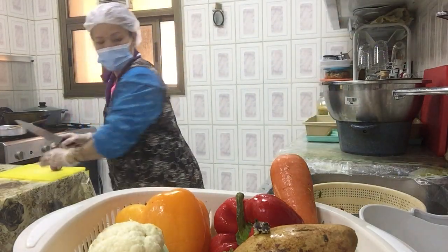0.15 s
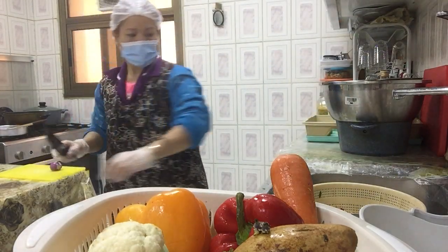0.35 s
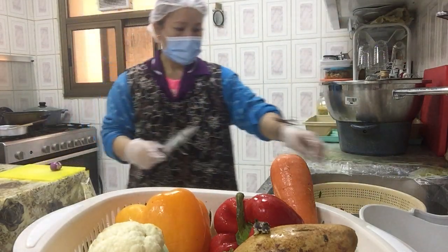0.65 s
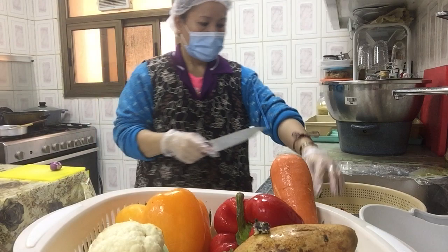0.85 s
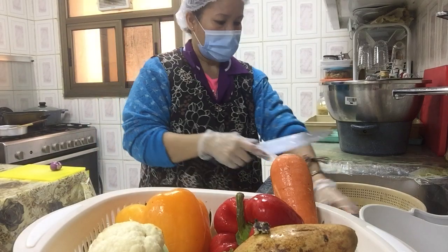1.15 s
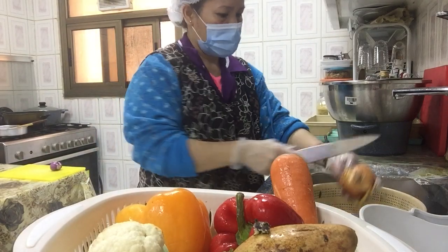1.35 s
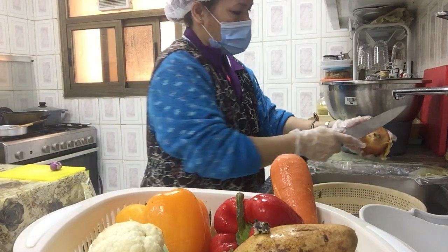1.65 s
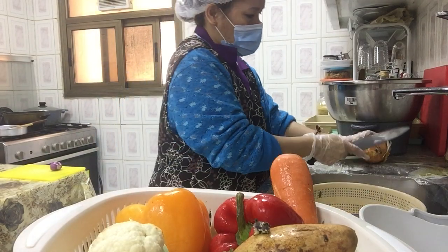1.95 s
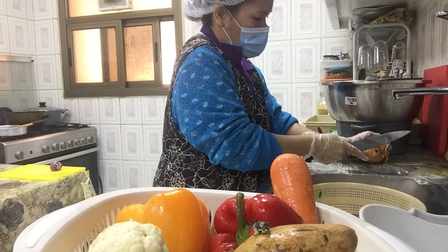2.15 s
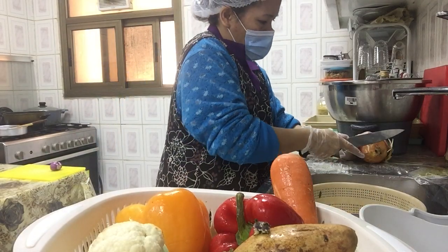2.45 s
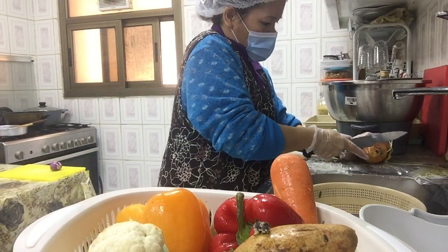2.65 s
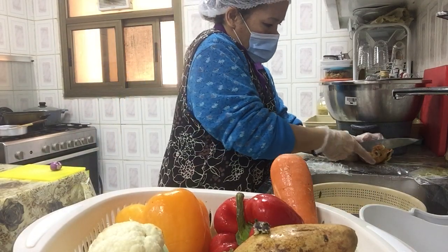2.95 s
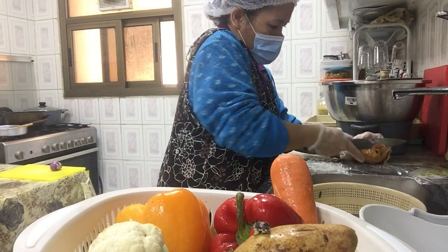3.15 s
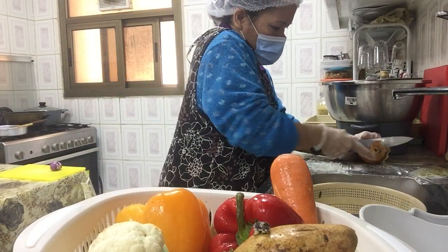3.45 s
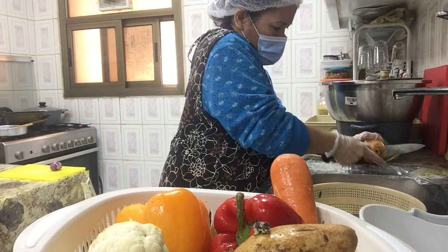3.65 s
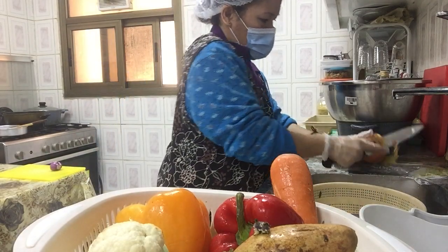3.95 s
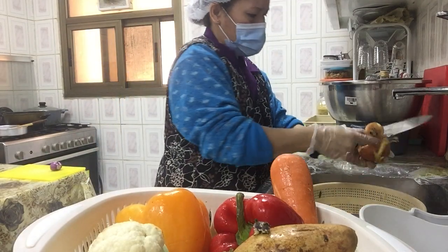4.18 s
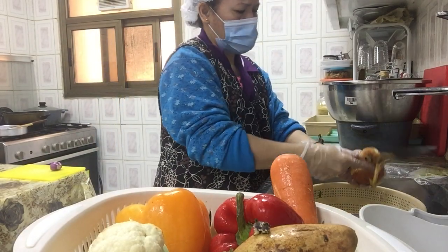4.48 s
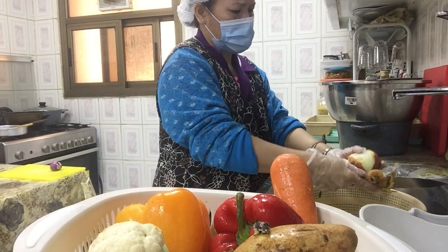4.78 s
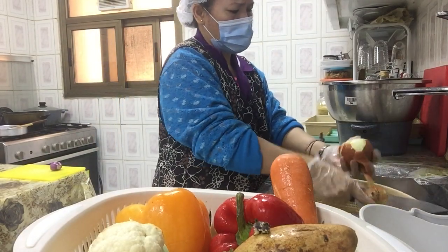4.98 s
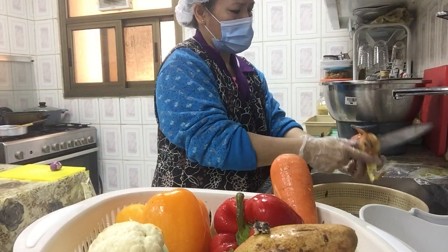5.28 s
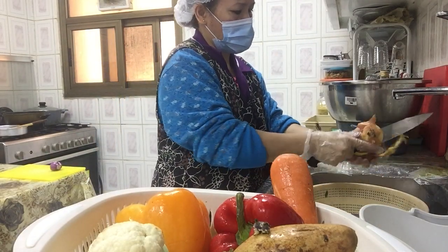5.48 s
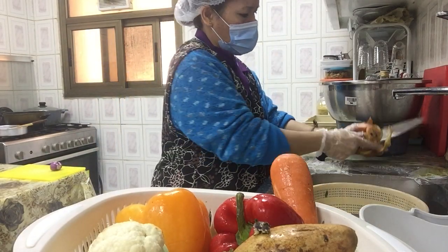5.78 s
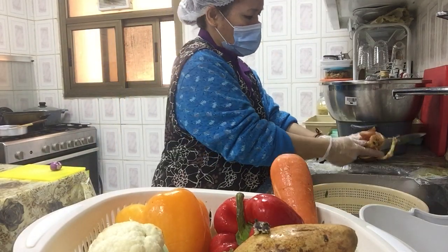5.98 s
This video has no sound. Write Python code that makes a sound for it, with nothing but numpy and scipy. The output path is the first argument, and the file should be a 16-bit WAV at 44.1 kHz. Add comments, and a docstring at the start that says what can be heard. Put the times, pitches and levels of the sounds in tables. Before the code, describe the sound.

A steady low motor hum and soft rush of air fill a small tiled kitchen. A knife peels an onion over a steel sink: faint rustles at first, then crisper papery tears and bright snaps, the sharpest past the middle. Peel drops into a plastic basket with a dull clatter, and hands thud softly on the counter near the end. Close microphone, short hard reflections.

```python
"""Motors hum under a low rush of air in a tiled kitchen while an onion is peeled with a knife over a steel sink.
Stroke by stroke, from faint rustles to louder tearing, the dry skin rustles, tears and snaps:
clumped random clicks and short noise volleys, coloured.
Peel drops into a plastic basket in the sink (ringing modes and clatter); hands thud softly on the counter (low swings).
Tiles, sink and walls add their reflections, and the microphone drops the deepest bass."""
import sys
import numpy as np
from scipy import signal
from scipy.fft import rfft, irfft
from scipy.io import wavfile
from scipy.ndimage import uniform_filter1d

SR = 44100
rng = np.random.default_rng(int(sys.argv[2]) if len(sys.argv) > 2 else 0)


def transcribe(u):
    """Save the signal u as a 16-bit wav file named by the first command-line argument.

    u: samples, shape (n,) or (channels, n), limited to [-1, 1]; the rate is SR.
    q: integer samples, one column per channel.
    """
    v = np.clip(np.atleast_2d(u).T, -1, 1)
    q = np.round(v * 32767).astype(np.int16)
    wavfile.write(sys.argv[1], SR, q)


N = 269892
TIME = np.arange(N) / SR

# motor and mains tones: f/Hz, rms level/dB
MOTOR_TONES = [(100.2, -46), (170.9, -48.5), (230.1, -66), (494.6, -75.5), (642, -70.5), (741.5, -77.5),
               (785.3, -83)]
# spectrum of the low rush of air: f/Hz, relative level per Hz/dB
AIR_SPECTRUM = [(25, -34), (45, -7.5), (80, 2.5), (115, -2.5), (160, 2), (220, -7.5), (310, -17.5),
                (420, -26), (650, -18), (950, -27.5), (1400, -26.5), (2500, -33), (6000, -44.5),
                (16000, -49.5)]
# resonances in the rush of air: f/Hz, filter width/Hz, rms level/dB
AIR_RESONANCES = [(324, 43, -72), (814, 130, -74), (1174, 220, -76), (1898, 95, -78), (2168, 69, -85),
                  (2423, 27, -79)]
# decay of the tiled room: f/Hz, t60/s
ROOM_DECAY = [(100, 0.33), (1000, 0.36), (4000, 0.3), (15000, 0.58)]
# soft thuds through the counter: t/s, relative peak level/dB, f/Hz, swell time/s
COUNTER_THUDS = [(2.061, -33, 83, 0.013), (2.876, -32.5, 122, 0.02), (3.734, -26.5, 98, 0.012),
                 (5.142, -25, 86, 0.014), (5.175, -21.5, 120, 0.0041), (5.215, -26.5, 94, 0.022),
                 (5.24, -25.5, 83, 0.016), (5.971, -13, 112, 0.0065), (6.018, -26, 86, 0.01)]
# knocks of knife and peel on basket and sink: t/s, relative level/dB, contact brightness f/Hz
SINK_KNOCKS = [(2.054, -36.5, 3020), (4.684, -40, 3000), (5.044, -19.5, 1860), (5.05, -23.5, 1090),
               (5.062, -23.5, 890), (5.097, -26.5, 1010), (5.17, -28.5, 2620), (5.181, -21, 500),
               (5.188, -33.5, 2380), (5.205, -27.5, 2200), (5.222, -32, 1600), (5.963, -32.5, 2230),
               (5.973, -28.5, 398)]
# modes that ring in basket and sink: f/Hz, relative level/dB, t60/s
SINK_MODES = [(73.6, -7, 0.28), (139, -4, 0.12), (187.5, -7.5, 0.13), (244, -12, 0.064), (330, -22, 0.19),
              (403, -19.5, 0.077), (518, -23.5, 0.07), (600, -13, 0.044), (713, -21.5, 0.19),
              (814, -32.5, 0.23), (1051, -18.5, 0.12), (1146, -15.5, 0.029), (1337, -19, 0.05),
              (2000, -13.5, 0.05)]
# spectrum of the basket's dense clatter: f/Hz, relative level per Hz/dB
CLATTER_SPECTRUM = [(35, -32), (70, 7.5), (100, 7.5), (200, 11.5), (300, 1), (450, -5), (750, -1.5),
                    (920, -5), (1200, -8), (1600, -7.5), (1950, -10.5), (2500, -8.5), (6000, -6.5),
                    (16000, -33)]
# blade slipping into the flesh, or a sleeve brushing: start t/s, length/s, relative level/dB
SLIPS = [(0.55, 0.077, -61), (2.055, 0.014, -66), (2.88, .05, -58.5), (3.135, 0.014, -59.5),
         (3.31, .11, -57.5), (3.71, 0.099, -55)]
# spectrum of those slips: f/Hz, relative level per Hz/dB
FLESH_SPECTRUM = [(120, -39), (300, 11), (450, -5.5), (680, 6), (930, -13.5), (1250, 2), (1700, -5.5),
                  (3000, -17), (8000, -57)]
# strokes of glove and blade over dry skin: start t/s, length/s, relative rubbing level/dB, relative tearing level/dB
SKIN_STROKES = [(0.005, .025, -72, -66.5), (0.523, .04, -67, -74), (0.576, 0.04, -62, -73),
                (0.794, 0.027, -74, -76), (1.095, 0.035, -56.5, -51), (1.146, 0.014, -57.5, -56),
                (1.313, 0.011, -63, -58.5), (1.578, 0.022, -65, -67), (1.673, 0.11, -67.5, -64.5),
                (1.921, .01, -68, -61), (2.035, 0.035, -55, -53), (2.117, .005, -67, -60),
                (2.624, .06, -75, -72), (2.711, .02, -65, -57), (2.746, 0.036, -54, -46.5),
                (2.861, 0.039, -51.5, -44.5), (2.96, 0.016, -63, -57), (3.114, 0.037, -62.5, -62.5),
                (3.291, 0.11, -54, -51.5), (3.403, 0.0081, -50.5, -50), (3.536, 0.025, -65, -59),
                (3.692, 0.032, -44.5, -44.5), (3.729, 0.032, -47, -41.5), (3.94, 0.067, -63, -65.5),
                (4.085, .02, -58, -57), (4.107, 0.041, -57.5, -53.5), (4.24, .02, -49, -48.5),
                (4.305, 0.016, -51.5, -52.5), (4.54, .05, -64.5, -59), (4.626, 0.05, -54, -49.5),
                (4.685, 0.035, -40.5, -33), (4.827, 0.02, -53, -54), (4.991, 0.0063, -45, -40),
                (5.162, 0.026, -51.5, -51.5), (5.288, .05, -59, -55.5), (5.392, 0.066, -54, -53),
                (5.477, 0.012, -50.5, -46.5), (5.61, 0.055, -67.5, -65), (5.731, 0.055, -68, -65),
                (5.917, 0.064, -58.5, -57), (5.991, .012, -55, -50.5), (6.11, .02, -61, -60)]
# spectrum of rubbing skin: f/Hz, relative level per Hz/dB
RUB_SPECTRUM = [(300, -9.5), (650, -0.5), (950, -20), (1400, -3), (2000, -4.5), (2700, -1.5), (4300, 3),
                (6000, 0), (8000, -8.5), (16000, -48)]
# spectrum of finely tearing skin: f/Hz, relative level per Hz/dB
TEAR_SPECTRUM = [(2000, -12), (5000, -20), (7000, -4.5), (8500, 1), (10000, -2), (12000, 1), (14000, -1),
                 (16000, -9)]
# single cracks of the skin: t/s, relative level/dB, centre f/Hz, relative hollow body level/dB
SKIN_SNAPS = [(1.1044, -37, 12600, -17), (1.714, -46, 3270, -18), (1.9139, -35, 6700, -22),
              (2.6944, -47, 7100, -18), (2.741, -22.5, 12200, -37), (2.763, -24.5, 12100, -27),
              (2.862, -32, 11000, -26), (2.966, -30.5, 12500, -26), (3.08, -43, 12000, -24),
              (3.102, -39, 13400, -19), (3.413, -26, 3700, -25), (3.677, -36.5, 4450, -6),
              (3.727, -21, 11100, -10), (3.8018, -28.5, 12000, -18), (4.0714, -41.5, 4440, -14),
              (4.156, -37, 3040, -16), (4.213, -37, 6160, -6), (4.2418, -28, 9000, -11),
              (4.2537, -26, 3660, -22), (4.3084, -27.5, 5200, -4), (4.5927, -24, 7860, -30),
              (4.6374, -30, 8650, -20), (4.683, -12.5, 9100, -9), (4.8308, -26, 6400, -3.5),
              (4.9839, -22, 4800, -10), (4.9897, -24, 6800, -3), (5.477, -27.5, 7050, -1),
              (5.994, -26, 7100, -9)]
# steel bowls and blade singing faintly with the crackle: f/Hz, width/Hz, relative level/dB
STEEL_MODES = [(1970, 86, -0.5), (2955, 25, -3), (4430, 130, -11), (5534, 14, 0), (6600, 13, -1.5),
               (8370, 16, -8), (11323, 25, -2)]

AIR_DB = -47.5
# a stroke grips quickly, holds, then lets the skin settle; a slip does so more gently
GRIP_DB_PER_S, SETTLE_DB_PER_S = 947, 187
SLIP_IN_DB_PER_S, SLIP_OUT_DB_PER_S = 400, 147
SNAP_DECAY_S = 0.0045  # how fast the volley of one crack fades
CUTOFF_HZ = 16100  # top of the recorded band


def from_db(db):
    """Decibels to gain."""
    return 10 ** (np.asarray(db) / 20)


def rms_one(x):
    """Scale to rms 1."""
    return x / np.sqrt(np.mean(x ** 2) + 1e-20)


def at_hz(points, hz):
    """Read a table on a log-frequency axis."""
    known, values = np.transpose(points)
    return np.interp(np.log(np.maximum(hz, 1)), np.log(known), values)


def drift(rate):
    """Smooth chance with spread 1 and about `rate` turns a second."""
    return rms_one(np.interp(TIME * rate, np.arange(8192), rng.standard_normal(8192)))


def colour(x, spectrum):
    """Causal (minimum-phase) filter with the given spectrum and unit power gain."""
    size = 8192
    hz = np.arange(size // 2 + 1) * SR / size
    gain = rms_one(from_db(at_hz(spectrum, hz)))
    # folding the cepstrum onto positive times makes the filter minimum-phase
    cepstrum = irfft(np.log(gain))
    cepstrum[1:size // 2] *= 2
    cepstrum[size // 2 + 1:] = 0
    response = irfft(np.exp(rfft(cepstrum)))
    return signal.fftconvolve(x, response)[:len(x)]


def add(out, s, sound):
    """Mix a sound in at time s."""
    start = max(0, round(s * SR))
    out[start:start + len(sound)] += sound[:max(0, N - start)]


def gestures(rows, rise_db_per_s, fall_db_per_s):
    """Gain over time for rows of (start s, length s, dB): each rises, holds and falls; overlaps add in power."""
    power = 0
    for start, length, db in rows:
        before = np.maximum(start - TIME, 0)
        after = np.maximum(TIME - start - length, 0)
        level = db - rise_db_per_s * before - fall_db_per_s * after
        power = power + from_db(np.maximum(level, -140)) ** 2
    return np.sqrt(power)


def fractures(per_s, spread_db, clump_db):
    """Tiny breaks of uneven size that come in clumps; the slow level is even."""
    excess_db = abs(spread_db) * np.minimum(rng.exponential(1, N), 4)
    sizes = from_db(excess_db + clump_db * drift(150)) * rng.choice([-1, 1], N)
    clicks = sizes * (rng.random(N) < per_s / SR)
    slow_power = np.abs(uniform_filter1d(clicks ** 2, SR // 20))
    return clicks / np.sqrt(slow_power + 1e-6)


def kitchen(x, wet_db, build_s=0.0018):
    """Direct sound plus a dense tail off the tiles, with its own decay time in each band."""
    t, tail = TIME[:SR * 2 // 3], 0
    edges = np.geomspace(60, 18000, 9)
    for low, high in zip(edges, edges[1:]):
        band_pass = signal.butter(2, [low, high], "band", fs=SR, output="sos")
        band = signal.sosfilt(band_pass, rng.standard_normal(len(t)))
        t60 = at_hz(ROOM_DECAY, np.sqrt(low * high))
        tail = tail + band * from_db(-60 * t / t60)
    tail = tail * (1 - np.exp(-t / build_s))
    reflected = signal.fftconvolve(x, tail / np.linalg.norm(tail))[:N]
    return x + from_db(wet_db) * reflected


def near_surfaces(x, scatter_db=-4.0, scatter_s=0.0046, tail_db=-5.5, tail_t60=0.43):
    """Sink and walls smear each click; the echo pattern keeps changing as the hands move."""
    t, out = TIME[:SR // 3], np.zeros(N)
    step = SR // 16
    padded = np.pad(x, (step, 2 * step))
    early, late = np.exp(-t / scatter_s), from_db(-60 * t / tail_t60)
    fading = from_db(scatter_db) * early / np.linalg.norm(early)
    fading = fading + from_db(tail_db) * late / np.linalg.norm(late)
    # overlapping windows crossfade from one echo pattern to the next
    for start in range(0, N + step, step):
        response = rng.standard_normal(len(t)) * fading
        response[0] = 1  # direct sound
        windowed = padded[start:start + 2 * step] * np.hanning(2 * step)
        heard = signal.fftconvolve(windowed, response)
        add(out, max(0, start - step) / SR, heard[max(0, step - start):])
    return out


def motors(waver_db=-0.05):
    """Nearly steady tones over a low rush of air that a few resonances colour."""
    tones = 0
    for hz, db in MOTOR_TONES:
        level = from_db(db + waver_db * drift(4.0))
        tones = tones + level * np.sin(2 * np.pi * (hz * TIME + rng.random()))
    rush = from_db(AIR_DB) * colour(rng.standard_normal(N), AIR_SPECTRUM)
    for hz, width, db in AIR_RESONANCES:
        resonance = signal.iirpeak(hz, hz / width, fs=SR)
        once = signal.lfilter(*resonance, rng.standard_normal(N))
        twice = signal.lfilter(*resonance, once)
        rush = rush + from_db(db) * rms_one(twice)
    return np.sqrt(2) * tones + rush  # sqrt(2) turns rms into sine peak


def thuds():
    """A soft push makes the counter swing for a few cycles."""
    out, t = np.zeros(N), TIME[:SR // 4]
    for s, db, hz, swell in COUNTER_THUDS:
        swing = (t / swell * np.exp(1 - t / swell)) ** 2
        add(out, s, from_db(db) * swing * np.sin(2 * np.pi * hz * t))
    return out


def knocks(uneven_db=1.0, clatter_db=-3.0, clatter_s=0.01):
    """Each blow rings the modes and clatters the basket into the room; a low contact cutoff dulls both."""
    ringing, clattering, t = np.zeros(N), np.zeros(N), TIME[:SR // 2]
    hz, mode_db, t60 = np.transpose(SINK_MODES)[:, :, None]
    for s, db, bright_hz in SINK_KNOCKS:
        strength = from_db(mode_db + uneven_db * rng.standard_normal(hz.shape))
        strength = strength * rng.choice([-1, 1], hz.shape)
        modes = strength * from_db(-60 * t / t60) * np.sin(2 * np.pi * hz * t)
        ring = np.sum(modes, axis=0)
        clatter = colour(rng.standard_normal(len(t)) * np.exp(-t / clatter_s), CLATTER_SPECTRUM)
        contact = signal.butter(2, min(bright_hz, SR / 3), fs=SR, output="sos")
        add(ringing, s, from_db(db) * signal.sosfilt(contact, ring))
        add(clattering, s, from_db(db + clatter_db) * signal.sosfilt(contact, clatter))
    low_cut = signal.butter(4, 62, "high", fs=SR, output="sos")  # filters out what lies below the lowest ringing
    return signal.sosfilt(low_cut, ringing + kitchen(clattering, wet_db=-1.0))


def scrape():
    """Slips against something soft sound low and dull."""
    slips = colour(fractures(per_s=1500, spread_db=5.5, clump_db=0.0), FLESH_SPECTRUM)
    return slips * gestures(SLIPS, SLIP_IN_DB_PER_S, SLIP_OUT_DB_PER_S)


def steel(x):
    """Narrow resonances pick up the crackle and ring on briefly."""
    ringing = 0
    for hz, width, db in STEEL_MODES:
        resonance = signal.iirpeak(hz, hz / width, fs=SR)
        ringing = ringing + from_db(db) * signal.lfilter(*resonance, x + 1e-18)
    return x + ringing


def snaps(level_db=-10.0, skirt_db=-15.5, first_break=4.0):
    """A crack runs through a stiff shell of skin: one sharp break, then a quickly fading volley."""
    out, t = np.zeros(N), TIME[:SR // 15]
    for s, db, hz, body_db in SKIN_SNAPS:
        volley = rng.standard_normal(len(t)) * np.exp(-t / SNAP_DECAY_S)
        volley[0] = first_break
        body = [(150, body_db - 22), (900, body_db - 22), (1600, body_db)]
        peak = [(hz * 0.61, body_db / 2), (hz, 0), (hz * 2.26, skirt_db)]
        add(out, s, from_db(db + level_db) * colour(volley, body + peak))
    return out


def skin(rub_db=-3.5, tear_db=-3.0):
    """Papery layers rub under glove and blade, and crackle finely where they tear."""
    start, length, rubbing, tearing = np.transpose(SKIN_STROKES)
    rub = colour(fractures(per_s=2800, spread_db=2.5, clump_db=1.9), RUB_SPECTRUM)
    tear = colour(fractures(per_s=2000, spread_db=1.3, clump_db=0.9), TEAR_SPECTRUM)
    rub_gain = gestures(zip(start, length, rubbing + rub_db), GRIP_DB_PER_S, SETTLE_DB_PER_S)
    tear_gain = gestures(zip(start, length, tearing + tear_db), GRIP_DB_PER_S, SETTLE_DB_PER_S)
    return rub * rub_gain + tear * tear_gain


def scene():
    """Peeling and knocks in the room, over the hum."""
    strokes = near_surfaces(skin() + scrape())
    peeling = steel(strokes + kitchen(snaps(), wet_db=-7.0))
    bumps = knocks() + kitchen(thuds(), wet_db=-11.0)
    return (from_db(-0.79) * peeling + bumps + motors())[None]


def record(dry, low_cut_hz=36):
    """The microphone drops the deepest bass; the top is cut steeply."""
    low_cut = signal.butter(2, low_cut_hz, "high", fs=SR, output="sos")
    top_cut = signal.ellip(12, .1, 80, CUTOFF_HZ, fs=SR, output="sos")
    return signal.sosfilt(top_cut, signal.sosfilt(low_cut, dry))


dry = scene()
out = record(dry)
transcribe(out)
```